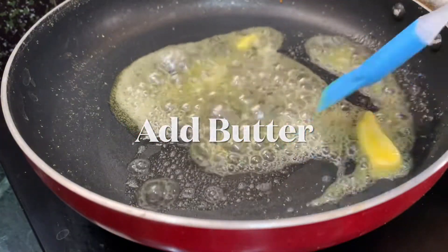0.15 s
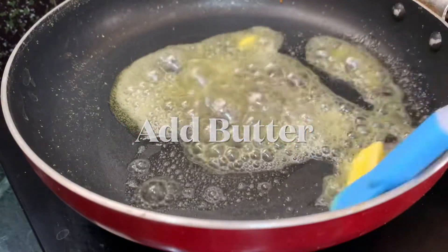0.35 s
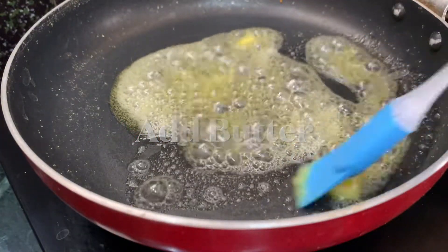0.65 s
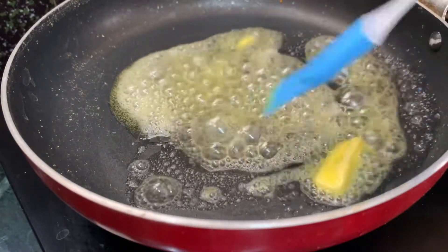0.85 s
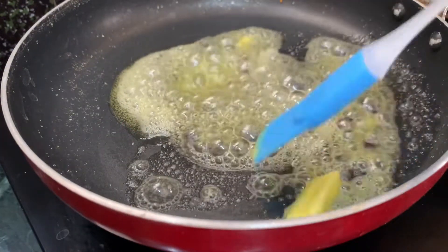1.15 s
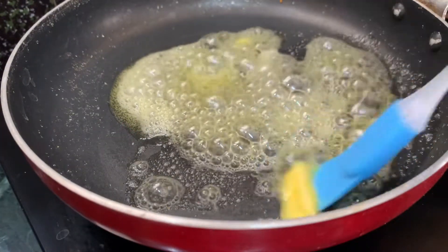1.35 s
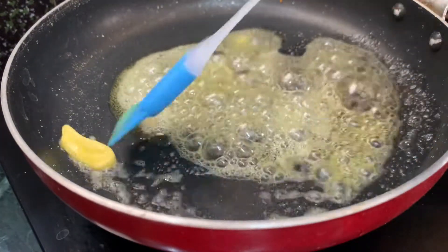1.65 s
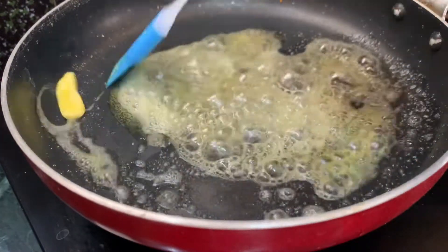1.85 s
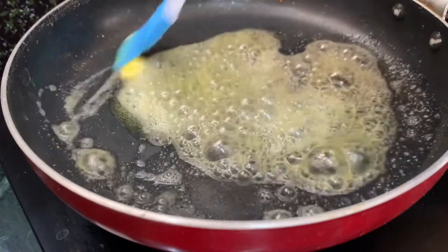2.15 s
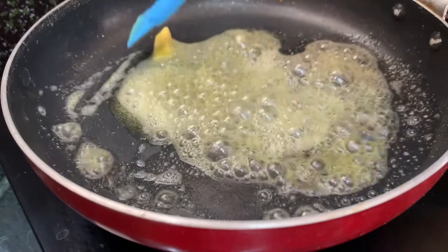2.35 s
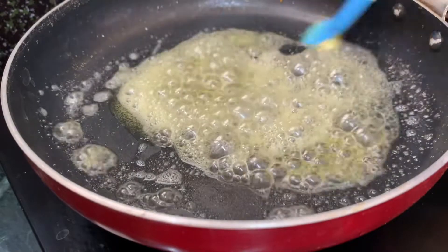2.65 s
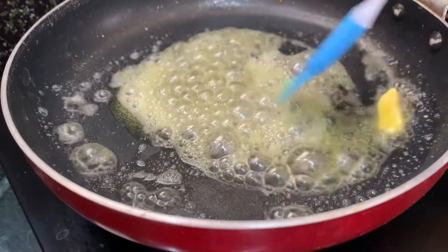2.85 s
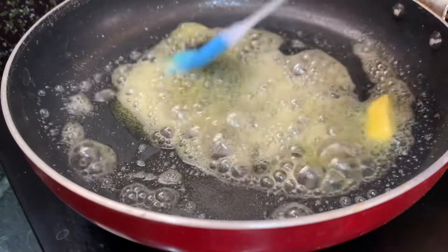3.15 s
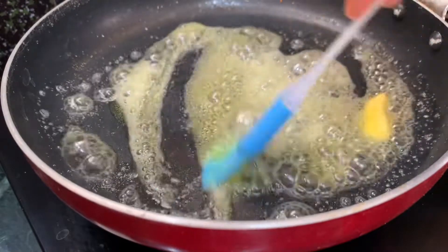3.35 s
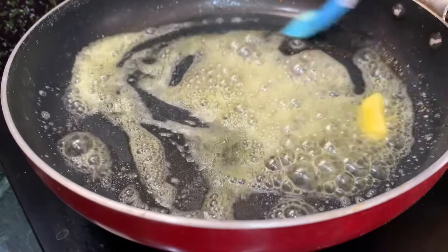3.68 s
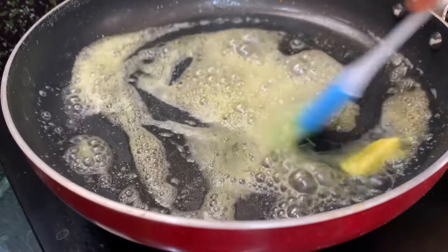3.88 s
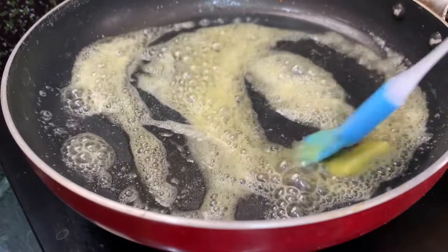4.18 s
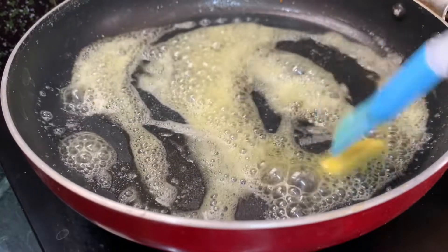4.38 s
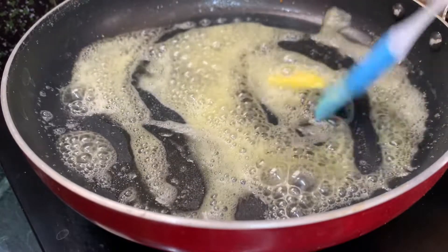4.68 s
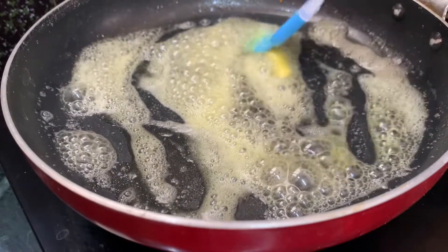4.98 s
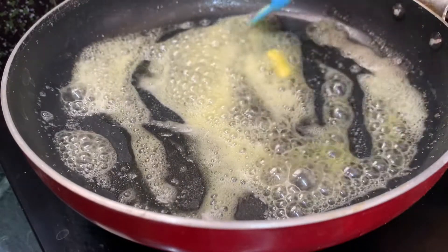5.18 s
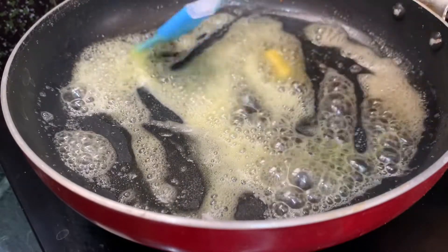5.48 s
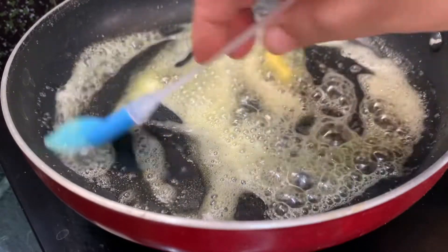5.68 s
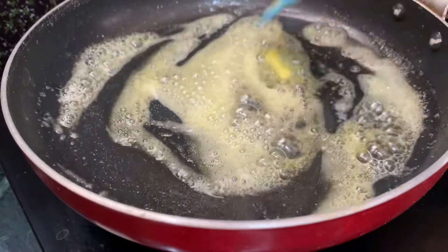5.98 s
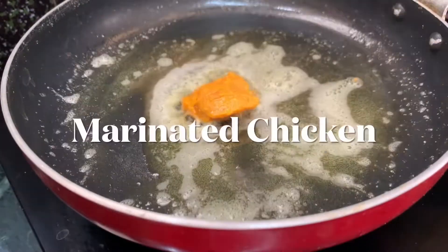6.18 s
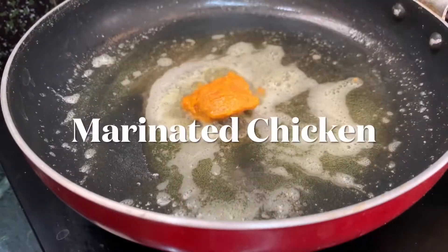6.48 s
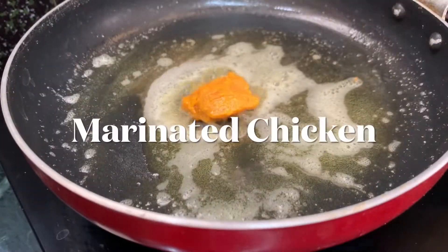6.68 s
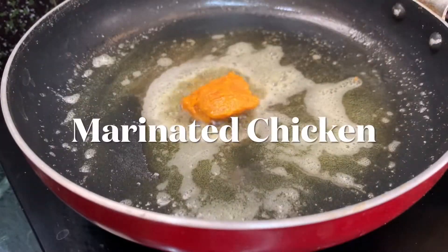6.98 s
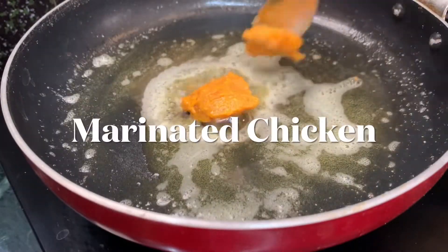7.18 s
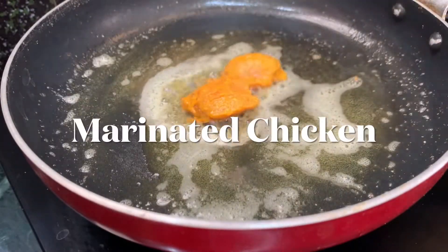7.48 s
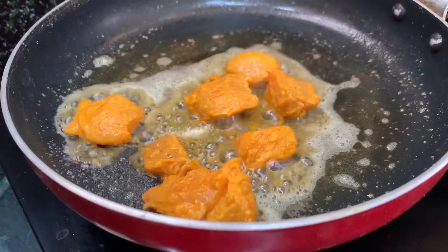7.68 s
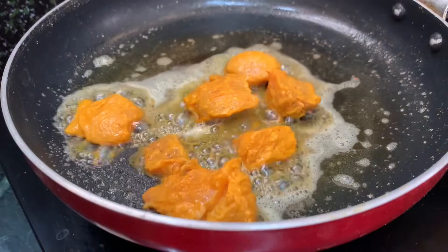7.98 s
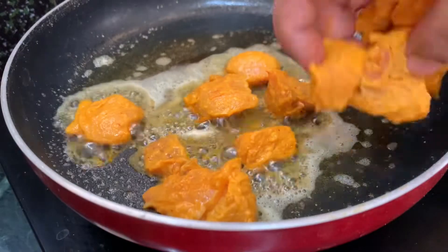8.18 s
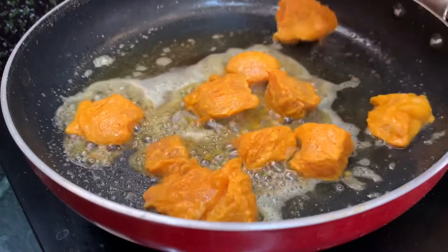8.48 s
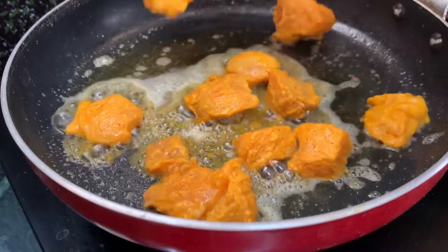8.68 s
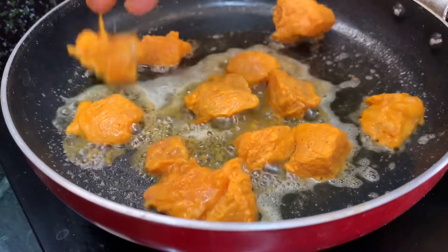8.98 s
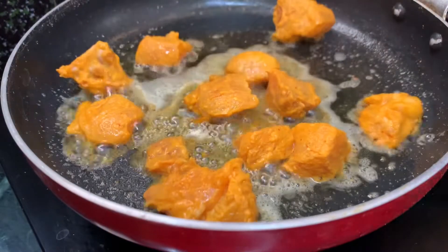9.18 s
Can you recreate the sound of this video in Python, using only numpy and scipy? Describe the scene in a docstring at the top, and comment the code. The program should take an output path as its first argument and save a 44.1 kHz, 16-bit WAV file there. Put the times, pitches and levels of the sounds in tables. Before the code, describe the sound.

Fine fizzing and random snapping pops of melting butter, heard close, with a low wavering rumble beneath. Spatula strokes make the boil swell briefly. At a cut, a brighter steady hiss of meat in fat takes over, with a light spoon touch and a brief dip. A short utensil knock opens the loudest stage: dense frying, bubbling steam and dull thuds.

```python
"""Butter foams and spits in a pan over a low kitchen drone; a soft spatula's pushes make the boil flare.
The sound dips at 6 s, the drone ends, and wet chicken hisses in the fat with steam gurgling under it.
After a light spoon touch and a second dip the pan is full: a utensil knocks on it once, then the pieces
fry loudly and gurgle. Frying and steam are random bursts of ringing bubbles, frying with hiss; pops, thuds,
plops and hums are short tones; the knock is filtered noise plus pan modes; the drone is shaped noise."""
import sys
import numpy as np
from scipy import signal
from scipy.fft import rfft, irfft, next_fast_len
from scipy.io import wavfile

SR = 44100
rng = np.random.default_rng(int(sys.argv[2]) if len(sys.argv) > 2 else 0)


def dump(signal):
    """Clip the signal to [-1, 1] and save it as 16-bit WAV at the path in sys.argv[1]."""
    limited = np.clip(np.atleast_2d(signal).T, -1, 1)
    pcm = np.round(limited * 32767).astype(np.int16)
    wavfile.write(sys.argv[1], SR, pcm)


N = 411889

# How hard each stage boils, before the stage's crackle gain and the spatula flares.
# Each row: time in seconds, fizz of fine bubbles in dB, crackle of coarse bubbles in dB.
BUTTER_BOIL = [(0, -39.5, -41), (.65, -44, -44), (1.65, -43.5, -45), (2.6, -41, -45), (3.55, -40.5, -43.5),
               (4.6, -43, -45.5), (6.04, -45, -44)]
FIRST_PIECE_BOIL = [(6.11, -34, -42), (6.55, -33, -44.5), (6.8, -34.5, -45), (7.2, -35, -43.5),
                    (7.37, -42.5, -45), (7.43, -37.5, -44), (7.51, -35, -41.5), (7.53, -47, -47.5),
                    (7.6, -48, -45)]
FULL_PAN_BOIL = [(7.63, -34.5, -40), (8.25, -35.5, -42.5), (8.35, -33.5, -40), (8.6, -32, -37),
                 (8.9, -34.5, -38), (9.122, -32.5, -37), (9.138, -43, -41.5), (9.21, -41, -41.5),
                 (9.3, -36.5, -40)]
# Relative colour of each stage. Each row: frequency in Hz, weight in dB.
BUTTER_COLOUR = [(200, -30), (700, -15.5), (1300, -13.5), (1900, -14.5), (2600, -12), (3300, -11),
                 (4400, -7), (5400, -7), (6600, -2.5), (8400, 1), (10000, -2.5), (11300, 3), (13500, -1.73),
                 (15500, 0)]
FIRST_PIECE_COLOUR = [(150, -22), (300, -17), (410, -14.5), (570, -21.5), (720, -13.5), (1000, -21.5),
                      (1330, -12), (2200, -11), (3000, -13.5), (4150, -9.5), (4450, -5), (4850, -25),
                      (5500, 3.5), (6100, -0.5), (6600, -2.5), (7200, -3), (8200, 1), (9300, 2),
                      (10500, -1), (12900, 1.5), (14000, 0.5), (15500, -1.5)]
FULL_PAN_COLOUR = [(300, -23), (570, -19), (720, -14.5), (1020, -19), (1300, -8), (1750, -9.5),
                   (2400, -8.5), (3400, -4), (4350, -2), (4900, -0.3), (5600, -1), (6900, -2.5), (7700, -1),
                   (8600, -1), (9600, -3), (11500, -2), (13000, 0.9), (15500, 2)]
# Stereo image of each stage. Each row: frequency in Hz, share common to both channels from 0 to 1,
# phase lag of the right channel in radians, left-minus-right balance in dB.
BUTTER_STEREO = [(300, .9, 0, 0), (900, .3, -.3, -3), (1500, .2, 0, -1.5), (2100, .28, 3, -1.3),
                 (3200, .22, 3.1, 0), (4000, .1, 0, 1.5), (5300, .2, 1.6, 3.7), (6300, .8, .1, 0),
                 (7300, .69, .9, -.3), (8400, .76, 2.3, 0), (9200, .98, 3.08, 0), (10000, .98, 3.2, 0),
                 (11000, .78, 4.3, 0), (12000, .74, 5.5, 0), (12800, .97, 6.25, 0), (13900, .97, 6.35, 0),
                 (14900, .6, 7.8, 0), (15700, .7, 9, 0)]
FIRST_PIECE_STEREO = [(400, .8, .2, 0), (1000, .5, -.5, -2), (1700, .72, -.4, -4.8), (2300, .75, -.4, -1.5),
                      (3200, .3, -.6, -2.7), (3750, .55, -.4, 0), (4100, .3, -1.8, 0), (4300, .98, -3.1, 0),
                      (4600, .995, -3.14, 0), (5300, .99, -3.14, 0), (5900, .94, -3.14, 0),
                      (6500, .62, -3, 0), (7100, .78, -3.14, 0), (7600, .42, -3.5, -1),
                      (8200, .55, -3.8, 2), (8700, .45, -5.4, 3.5), (9700, .65, -6, 5),
                      (10700, .33, -6.2, 4.3), (11600, .3, -6.1, 1.5), (12300, .84, -6.3, 0),
                      (13600, .87, -6.3, -.5), (14200, .55, -5.9, -1), (15500, .62, -4.8, 0)]
FULL_PAN_STEREO = [(400, .87, 0, .5), (1000, .65, -.7, -2.5), (1900, .45, -.7, -5.5), (2600, .3, .2, -3.5),
                   (3100, .35, -.6, -1), (3700, .42, -2.9, -1.5), (4400, .78, -3.2, 0),
                   (4900, .42, -3.9, -3), (5900, .28, -3.3, -.7), (6800, .3, -7.7, 1), (7500, .15, -9.3, 0),
                   (8400, .27, -13.2, 1.5), (9300, .2, -12.6, 2.8), (9900, .1, -15, 3.7),
                   (10500, .24, -16.3, 3), (11500, .35, -17.3, 1.7), (12500, .8, -18.7, .5),
                   (13400, .8, -18.7, 0), (14200, .6, -18.1, 0), (15400, .72, -17.3, 0)]
# The largest bubbles that burst. Each row: start in seconds, level in dB before the pop gain,
# pitch in Hz, snap as tearing noise relative to the ring.
LARGE_POPS = [(0.1507, -12, 11800, .3), (0.3174, -14, 12800, 0.49), (0.421, -23, 13500, .3),
              (0.549, -16, 11500, .6), (0.656, -22, 13400, 0.34), (0.9136, -15.5, 12400, .25),
              (1.074, -18, 12500, 0.71), (1.1548, -17, 9500, 0.56), (1.1902, -21, 9000, .5),
              (1.2632, -14, 12400, 0.27), (1.4756, -17, 12100, 0.36), (1.6546, -21, 6300, 0.48),
              (1.861, -23, 12500, .7), (1.8806, -19, 11900, .3), (2.1196, -16.5, 14600, .2),
              (2.2533, -17, 7000, 0.34), (2.747, -15.5, 12800, 0.9), (2.8216, -17, 12300, 0.36),
              (2.9545, -12.5, 7900, 0.45), (3.1322, -12.8, 12400, .6), (3.1612, -15.5, 6860, .6),
              (3.2261, -18, 7200, .5), (3.468, -16, 11700, .5), (3.5323, -12, 7950, .3),
              (3.7304, -17, 12600, .2), (3.844, -12.5, 12000, .4), (3.9304, -15, 12300, .5),
              (4.0228, -14, 12700, 0.22), (4.1046, -18, 13500, 0.33), (4.1121, -10, 9850, .5),
              (4.128, -14.5, 8500, .5), (4.3642, -11, 11200, 0.7), (4.4144, -21, 13400, 0.36),
              (4.4245, -21, 12600, .2), (4.4348, -14.5, 7060, 0.69), (4.699, -21, 13400, 0.33),
              (4.943, -23, 12400, 0.22), (4.9657, -7.5, 10800, 1.1), (4.982, -19.5, 12000, 1),
              (4.9846, -13.5, 7450, 1), (5.233, -13.5, 11800, 2.3), (5.2808, -14, 6560, 0.91),
              (5.2907, -15, 7700, 0.43), (5.2985, -19, 12500, 0.99), (5.348, -14, 11400, 0.96),
              (5.3925, -15.5, 7140, 0.28), (5.544, -15.5, 10000, 0.64), (5.6217, -14, 7700, 0.5),
              (5.667, -13, 9500, 0.61), (5.7009, -13.5, 11000, 0.73), (5.742, -20, 12500, .7),
              (5.8516, -14, 9600, 0.78), (5.8712, -17, 11100, .2), (5.8932, -11, 12300, .25),
              (5.9492, -21, 7460, 0.59), (5.999, -21, 12100, 0.86), (6.013, -16, 11950, 0.6),
              (6.1015, -9.5, 11500, .3), (6.1135, -18, 9300, 0.26), (7.1993, -7.5, 12800, .3),
              (8.0042, -11.5, 13300, 0.28)]
# Short wet sputters in the fat, and at 7.2 s a light spoon touch.
# Each row: start in seconds, length in seconds, level in dB, centre pitch in Hz.
SPUTTER_EVENTS = [(0.837, .015, -38.5, 8200), (1.892, .015, -43, 5530), (2.137, .004, -32, 5360),
                  (2.163, 0.0083, -50, 4000), (2.331, .015, -44, 3200), (2.446, 0.014, -41, 3530),
                  (2.958, 0.012, -33, 7550), (2.961, .045, -53, 3200), (3.14, .025, -57, 3500),
                  (3.72, 0.12, -50, 2700), (3.906, 0.029, -46, 3600), (4.128, 0.022, -43, 4180),
                  (4.442, 0.027, -44.5, 3830), (4.68, .04, -55, 2600), (5.094, 0.015, -42, 5470),
                  (5.283, .012, -36, 7300), (5.6, .03, -53, 6000), (7.204, .008, -40, 1630)]
# Steam escaping under the meat, before its echo.
# Each row: start in seconds, end in seconds, level in dB, spread of bubble sizes in dB.
GURGLE_SPELLS = [(6.148, 6.619, -55, 1), (6.601, 7.601, -53.5, 1.5), (7.619, 9.343, -51, 1.5),
                 (7.869, 9.149, -47, 1)]
# Relative colour of the steam. Each row: frequency in Hz, weight in dB.
GURGLE_COLOUR = [(38, -46), (62, -2), (105, 3), (170, 2.5), (220, -0.5), (290, -10), (390, -1), (440, -4),
                 (510, -20), (600, -15.5), (800, -12.5), (1000, -33)]
# Soft thuds of meat and plops of steam in the fat, before their echo.
# Each row: start in seconds, envelope peak in dB, pitch in Hz, swell time in seconds.
PLOP_EVENTS = [(3.587, -36.5, 910, 0.00078), (6.639, -32.5, 127, 0.0056), (6.727, -45, 230, .004),
               (6.987, -38, 117, 0.01), (7.167, -37, 148, 0.0049), (7.2, -40, 300, 0.0036),
               (7.226, -29.5, 184, 0.0022), (7.516, -32, 168, 0.0046), (7.887, -34.5, 395, 0.0049),
               (7.923, -53, 170, 0.0065), (7.969, -38.5, 405, 0.006), (8.004, -37, 401, .006),
               (8.036, -37, 397, 0.004), (8.084, -36, 149, .009), (8.14, -33.5, 410.7, 0.0054),
               (8.243, -36, 382, .005), (8.268, -33, 133, 0.012), (8.301, -35, 380, 0.0056),
               (8.323, -37, 430, 0.004), (8.379, -36.5, 376, 0.006), (8.382, -35, 151, 0.0079),
               (8.51, -41, 136, 0.012), (8.535, -35, 397, 0.0056), (8.588, -38.5, 402, .005),
               (8.673, -39, 124, .007), (8.736, -32, 250, 0.0017), (8.805, -40, 520, 0.0046),
               (8.921, -37, 139, 0.014), (9.0, -35, 630, 0.0017), (9.033, -26, 177, 0.005),
               (9.047, -29, 270, 0.0028), (9.101, -32.5, 113, 0.013), (9.16, -38.5, 250, 0.0057),
               (9.244, -43, 116, 0.0077)]
# Faint rounded hums that swell and fade, before their echo.
# Each row: start in seconds, length in seconds, pitch in Hz, envelope peak in dB.
HUMS = [(0, 0.082, 265, -40), (0.347, .115, 270, -41), (2.77, .19, 201, -41.5), (4.695, .03, 770, -47),
        (4.708, .031, 687, -38), (4.73, .07, 700, -51)]
# Relative colour of the kitchen drone. Each row: frequency in Hz, weight in dB.
DRONE_COLOUR = [(25, -20), (55, -10.5), (85, -0.5), (120, -4), (145, -8.5), (210, 0.5), (250, -15),
                (340, -5.5), (450, -18), (800, -29), (2000, -31)]
# Peaks in the drone. Each row: frequency in Hz, width in Hz, lift in dB above that colour.
DRONE_PEAKS = [(100.7, 11, 10.5), (209, 53, 3.8), (350, 48, 1.9), (503, 35, 10), (676, 25, 11)]
# The contacts that make up the utensil's knock on the pan.
# Each row: start in seconds, relative level in dB, hardness as a cut-off in Hz.
KNOCK_CONTACTS = [(7.631, -8.5, 450), (7.676, -7.5, 560), (7.6907, 0, 9000)]
# What the pan rings with. Each row: frequency in Hz, relative level in dB, 60 dB decay time in seconds.
PAN_MODES = [(180, -4.5, .14), (345, -5, .075), (406, 4, .09), (884, -3, .1), (957, -4, .1),
             (1067, -4.5, .086), (1194, -5, .11), (1984, 4.5, .085), (2035, -1, .07), (2170, 2, .05),
             (2490, 1, .075), (2895, -7, .09), (3020, -4, .09), (3338, 0, .07), (3542, -3, .09),
             (3693, 1.5, .08), (3761, .5, .09), (4025, 7, .065), (4840, -6, .06)]
# Relative colours of the contact and of its first instant. Each row: frequency in Hz, weight in dB.
CLACK_COLOUR = [(40, -50), (130, -6), (400, 7.5), (650, -0.5), (1100, 5.5), (1550, -6.5), (2200, 3),
                (2800, -11), (3500, 3.5), (4400, -3), (5000, -1), (5600, -10), (8000, -24), (15000, -31)]
CRACK_COLOUR = [(500, -26), (1550, -9), (2200, 10), (3600, 0), (4400, 0), (6000, -6), (8000, -6),
                (12000, -28)]
# The spatula pushes wet foam onto bare hot metal and the boil flares.
# Each row: start in seconds, length in seconds, added fizz in dB, added crackle in dB.
STROKES = [(2.488, 0.28, 1, 2.5), (2.95, 0.083, -1, 4), (3.114, 0.29, 2, 2.5), (3.67, 0.23, 4.5, 1),
           (3.852, 0.15, 9, 5), (4.027, 0.28, 7, -1), (4.963, 0.06, 1.5, 2)]

STROKE_PEAK = 0.33  # share of a stroke after which the flare is strongest
# Lesser pops fall at random in the butter; the loudest is SPIT_DB before the pop gain.
SPITS_PER_S, SPIT_DB, SPIT_RANGE_DB, SPIT_LO_HZ, SPIT_HI_HZ = 11, -21.5, 10, 6000, 13400
BUTTER_END_S = 6.06
DRONE_DB = -51.5
EDGE_HZ = 15900  # upper band limit


def sizzle(boil, colour, image, start, end, coarse_db, per_s, spread_db, clump_db, hiss_db, t60, patchy, fade):
    """Water boils out of hot fat: clumps of bursting bubbles over the hiss of countless smaller ones."""
    t = np.arange(int(start * SR), int(end * SR)) / SR
    s, fizz_db, crackle_db = np.transpose(boil)
    clumps = wander(len(t), rate_hz=32)
    bursts = evened(bubbles(len(t), per_s, spread_db, 380, 17000, ring=0.00029))
    hiss = amp(hiss_db) * rng.standard_normal(len(t))
    source = (bursts + hiss) * amp(clump_db * clumps)
    sound = coloured(stereo(source, image, t60, patchy=patchy), colour)
    sound = sound / band_rms(sound, 11000, 15500)
    # split near 8.8 kHz: crackle below, fizz above
    coarse = filtered(sound, lambda hz: 1 / (1 + (hz / 8800) ** 8))
    fine = sound - coarse
    fizz_flare_db, crackle_flare_db = flares(t)
    fizz = fine * amp(np.interp(t, s, fizz_db) + fizz_flare_db)
    crackle = coarse * amp(coarse_db + np.interp(t, s, crackle_db) + crackle_flare_db)
    fade_in_out = np.clip(np.minimum(t - start, end - t) / fade, 0, 1) ** 2
    return start, (fizz + crackle) * fade_in_out


def flares(t):
    """Change of fizz and crackle in dB as each spatula stroke swells quickly and settles slowly."""
    out = np.zeros((2, len(t)))
    for s, length, fizz_db, crackle_db in STROKES:
        swell = np.interp((t - s) / length, [0, np.clip(STROKE_PEAK, 0, 1), 1], [0, 1, 0])
        out += np.outer([fizz_db, crackle_db], swell)
    return out


def pops(ring=0.00029, gain_db=-12.5, tear_hz=4500):
    """A large bubble tears open with a snap and rings for a few cycles."""
    t, out = np.arange(200) / SR, np.zeros(N)
    rows = list(LARGE_POPS) + spits()
    envelope = np.exp(-t / ring) * (1 - np.exp(-3 * t / ring))
    for (s, db, hz, snap), noise in zip(rows, rng.standard_normal((len(rows), len(t)))):
        pop = (np.sin(2 * np.pi * hz * t) + snap * noise) * envelope
        add(out, s, amp(db + gain_db) * evened(pop))
    heard = stereo(out, BUTTER_STEREO, t60=.19, wet_db=-4, patchy=.85, patch_t60=.014)
    return filtered(heard, lambda hz: hz / np.hypot(hz, tear_hz))  # thins the low end


def spits(snap=0.36):
    """Draws the lesser bursts: start in seconds, level in dB before the pop gain, pitch in Hz, snap."""
    rows = []
    for when, size, pitch in rng.random((int(SPITS_PER_S * BUTTER_END_S), 3)):
        level_db = SPIT_DB - SPIT_RANGE_DB * size
        hz = SPIT_LO_HZ + (SPIT_HI_HZ - SPIT_LO_HZ) * pitch
        rows.append((when * BUTTER_END_S, level_db, hz, snap))
    return rows


def sputters(per_s=1300, spread_db=0.0, attack=0.0029, octaves=0.63, tail=0.091):
    """Water pockets boil off in quick runs of coarse bubbles around one pitch; a spoon touch is made alike."""
    out = np.zeros((2, N))
    for s, length, db, centre_hz in SPUTTER_EVENTS:
        t = np.arange(int((length + tail) * SR)) / SR
        swell = np.minimum(t / attack, 1) * np.exp(-(t / length) ** 2)
        source = swell * bubbles(len(t), per_s, spread_db, 1500, 10800, ring=0.00038, count=10)
        run = stereo(source, BUTTER_STEREO, t60=0.28, patchy=0.46)
        run = filtered(run, lambda hz: 1 / (1 + (np.log2((hz + 1) / centre_hz) / octaves) ** 4))
        # set the level by the run's whole energy, spread over its nominal length
        add(out, s, amp(db) * run / np.sqrt((run ** 2).sum() / (2 * length * SR)))
    return out


def gurgle(per_s=280, room_db=-7, fade=0.02):
    """Big slow steam bubbles escape from under the meat, each ringing at a low pitch."""
    out = np.zeros(N)
    for start, end, db, spread_db in GURGLE_SPELLS:
        t = np.arange(0, end - start, 1 / SR)
        source = bubbles(len(t), per_s, spread_db, 83, 766, ring=0.0053, count=16)
        blubs = evened(coloured(source, GURGLE_COLOUR))
        fade_in_out = np.minimum(np.minimum(t, t[-1] - t) / fade, 1)
        add(out, start, amp(db) * blubs * fade_in_out)
    return out + amp(room_db) * scatter(out, t60=0.26)


def plops(room_db=-12):
    """Soft thuds, plops and faint hums: short sine tones with rounded envelopes and an echo."""
    out = np.zeros(N)
    for s, db, hz, swell in PLOP_EVENTS:
        u = np.arange(int(8 * swell * SR)) / SR / swell  # time in swell times, peak at 1
        envelope = (u * np.exp(1 - u)) ** 2
        add(out, s, amp(db) * envelope * np.sin(2 * np.pi * hz * swell * u))
    for s, length, hz, db in HUMS:
        t = np.arange(int(length * SR)) / SR
        add(out, s, amp(db) * np.hanning(len(t)) * np.sin(2 * np.pi * hz * t))
    return out + amp(room_db) * scatter(out, t60=0.76)


def knocks(ring_db=-19, clack_db=-15.5, clack_t60=0.14, spread_hz=1500, apart_rad=1.73,
           crack_db=-9, crack_t60=.022):
    """Bright crack, short clack and the pan's food-damped modes; soft contacts rouse only the low ones."""
    t, out = np.arange(SR // 4) / SR, np.zeros((2, N))
    hz, db, t60 = np.transpose(PAN_MODES)[:, :, None]
    # the higher a mode, the more its phase differs between the channels
    between = apart_rad * np.array([.5, -.5])[:, None, None] * np.tanh(hz / spread_hz)
    alternate = np.pi * np.arange(len(hz))[:, None]  # every other mode starts inverted
    modes = amp(db - 60 * t / t60) * np.sin(2 * np.pi * hz * t + alternate + between)
    ring = modes.sum(1)
    for s, level_db, hard_hz in KNOCK_CONTACTS:
        contact = stereo(rng.standard_normal(len(t)), FULL_PAN_STEREO, t60=0.01, wet_db=8.0, patchy=0)
        clack = evened(coloured(contact, CLACK_COLOUR)) * amp(-60 * t / clack_t60)
        crack = evened(coloured(contact, CRACK_COLOUR)) * amp(-60 * t / crack_t60)
        blow = amp(ring_db) * ring + amp(clack_db) * clack + amp(crack_db) * crack
        blow = blow * np.minimum(t / 0.00067, 1)
        band = [110, np.clip(hard_hz, 200, SR / 3)]
        softness = signal.butter(2, band, "bandpass", fs=SR, output="sos")
        add(out, s, amp(level_db) * signal.sosfilt(softness, blow))
    return out


def drone(width=0.51, waver_db=1.0, waver_hz=4):
    """A low wavering rumble with a few fuzzy peaks, nearly alike in both channels, under the butter."""
    noise = rng.standard_normal((3, N))
    shared_and_wide = noise[0] + width * noise[1:]

    def peaks(hz):
        return 1 + sum((amp(db) - 1) / (1 + (2 * (hz - f) / w) ** 2) for f, w, db in DRONE_PEAKS)

    rumble = filtered(coloured(shared_and_wide, DRONE_COLOUR), peaks)
    rumble = evened(rumble * amp(waver_db * wander(N, waver_hz)))
    fade_out = np.clip((BUTTER_END_S - np.arange(N) / SR) / 0.018, 0, 1)
    return amp(DRONE_DB) * rumble * fade_out


def bubbles(length, per_s, spread_db, lo_hz, hi_hz, ring, count=24):
    """Bursts at random moments: each rings briefly at one of count pitches; sizes vary by spread_db."""
    out, r = np.zeros(length), np.exp(-1 / ring / SR)
    for hz in np.linspace(lo_hz, hi_hz, count):
        chance, size = rng.random((2, length))
        hit = chance < per_s / count / SR
        signed = 2 * size[hit] - 1
        rarity = np.minimum(-np.log(abs(signed) + 1e-9), 5)  # mostly small, seldom large
        clicks = np.zeros(length)
        clicks[hit] = np.sign(signed) * amp(spread_db * rarity)
        # a two-pole resonator turns each click into a decaying cosine
        turn = r * np.cos(2 * np.pi * hz / SR)
        out += signal.lfilter([1, -turn], [1, -2 * turn, r * r], clicks + 1e-12)
    return out


def stereo(x, image, t60, wet_db=0, patchy=.5, patch_t60=0.051):
    """Spreads x over two channels: a shared part with a phase lag per frequency, plus diffuse echoes and noise."""
    f, share, lag, balance_db = np.transpose(image)
    side = np.array([[.5], [-.5]])

    def common(hz):
        return np.clip(np.interp(hz, f, share), 0, 1)

    shared = filtered(x, lambda hz: np.sqrt(common(hz)) * np.exp(1j * side * np.interp(hz, f, lag)))
    # fresh noise that follows the dying energy
    keep, patchy = np.exp(-2 * np.log(1000) / t60 / SR), np.clip(patchy, 0, 1)
    energy = signal.lfilter([1 - keep], [1, -keep], x * x + 1e-20)
    late = np.sqrt(energy) * rng.standard_normal((2, len(x)))
    echoes = np.sqrt(patchy) * patches(x, patch_t60) + np.sqrt(1 - patchy) * late
    diffuse = amp(wet_db) * filtered(echoes, lambda hz: np.sqrt(1 - common(hz)))
    return filtered(shared + diffuse, lambda hz: amp(side * np.interp(hz, f, balance_db)))


def patches(x, t60, count=3, size=96):
    """Bursts come from changing spots in the pan, each spot with its own random echo colour."""
    spot = np.repeat(rng.integers(0, count, len(x) // size + 1), size)[:len(x)]
    return sum(scatter(x * (spot == k), t60) for k in range(count))


def scatter(x, t60):
    """Dense random echoes that die away, different for each channel."""
    t = np.arange(int(t60 * SR) + 16) / SR
    taps = rng.standard_normal((len(t), 2)).T * amp(-60 * t / t60)
    taps = taps / np.linalg.norm(taps, axis=1, keepdims=True)
    return signal.oaconvolve(x[None], taps, axes=1)[:, :len(x)]


def wander(length, rate_hz):
    """Slow random drift with an RMS of one."""
    return evened(filtered(rng.standard_normal(length), lambda hz: 1 / (1 + (hz / rate_hz) ** 2)))


def coloured(x, points):
    """Gives x a spectrum, rolled off in the deepest bass."""
    return filtered(x, lambda hz: amp(read(points, hz)) * hz / np.hypot(hz, 20))


def read(points, hz):
    """A spectrum in dB, joined by straight lines over log frequency."""
    f, db = np.transpose(points)
    return np.interp(np.log(hz + 1), np.log(f), db)


def filtered(x, response):
    """Applies a response given as a function of frequency."""
    size = next_fast_len(x.shape[-1] + 4096, True)
    spectrum = rfft(x, size) * response(np.fft.rfftfreq(size, 1 / SR))
    return irfft(spectrum, size)[..., :x.shape[-1]]


def band_rms(x, lo_hz, hi_hz):
    """Level of the centre of a stereo sound within one band."""
    return np.std(filtered(x.mean(0), lambda hz: (hz > lo_hz) & (hz < hi_hz)))


def evened(x):
    """Scales a sound to an RMS of one."""
    return x / np.sqrt(np.mean(x ** 2) + 1e-20)


def amp(db):
    """Turns dB into an amplitude factor."""
    return 10 ** (np.asarray(db) / 20)


def add(mix, s, sound):
    """Mixes a sound in from time s in seconds."""
    part = mix[..., max(round(s * SR), 0):][..., :sound.shape[-1]]
    part += sound[..., :part.shape[-1]]


def scene():
    """Three stages of frying, one after the other, with all the small sounds around them."""
    frying = np.zeros((2, N))
    add(frying, *sizzle(BUTTER_BOIL, BUTTER_COLOUR, BUTTER_STEREO, start=0, end=6.062, coarse_db=3.5,
                        per_s=5000, spread_db=3.5, clump_db=.75, hiss_db=-7.5, t60=.08, patchy=.7, fade=.005))
    add(frying, *sizzle(FIRST_PIECE_BOIL, FIRST_PIECE_COLOUR, FIRST_PIECE_STEREO, start=6.065, end=7.618,
                        coarse_db=9.0, per_s=9000, spread_db=3.0, clump_db=0.5, hiss_db=-1.0,
                        t60=0.097, patchy=1.0, fade=0.027))
    add(frying, *sizzle(FULL_PAN_BOIL, FULL_PAN_COLOUR, FULL_PAN_STEREO, start=7.597, end=9.38,
                        coarse_db=4.5, per_s=14000, spread_db=2.0, clump_db=1.0, hiss_db=1.5,
                        t60=0.19, patchy=0.8, fade=0.037))
    return frying + pops() + sputters() + gurgle() + plops() + knocks() + drone()


def record(dry):
    """Rounds off the loudest peaks, then applies a steep band limit."""
    rounded = .85 * np.tanh(dry / .85)
    low_pass = signal.firwin(511, EDGE_HZ, window=("kaiser", 9), fs=SR)
    return signal.oaconvolve(rounded, low_pass[None], "same")


dry = scene()
out = record(dry)
dump(out)
```